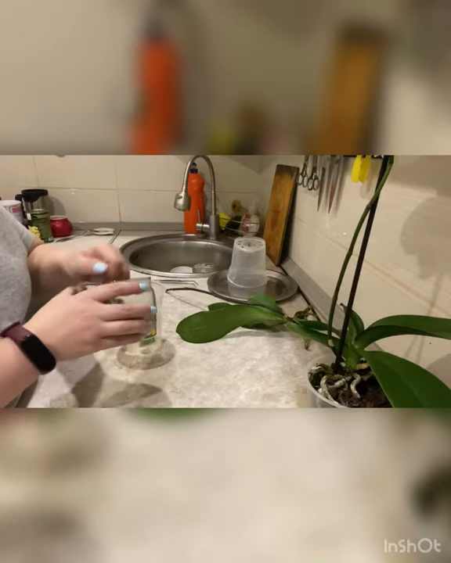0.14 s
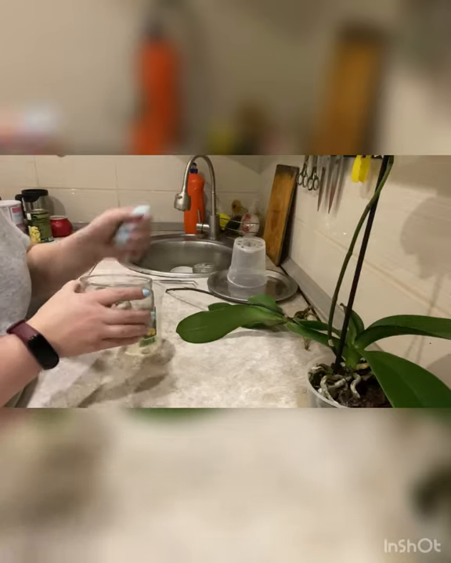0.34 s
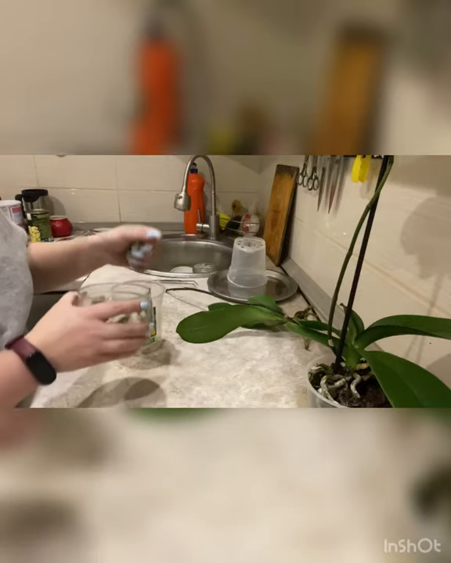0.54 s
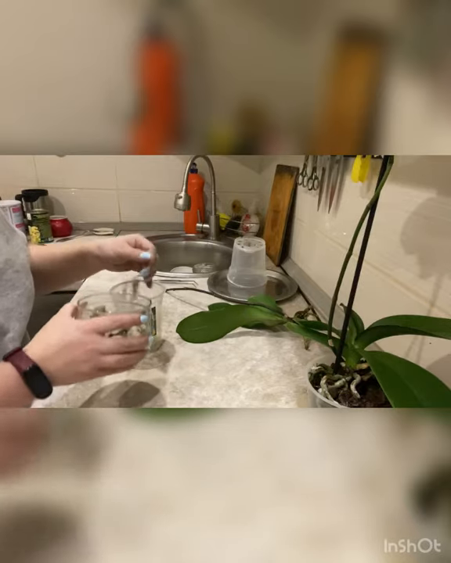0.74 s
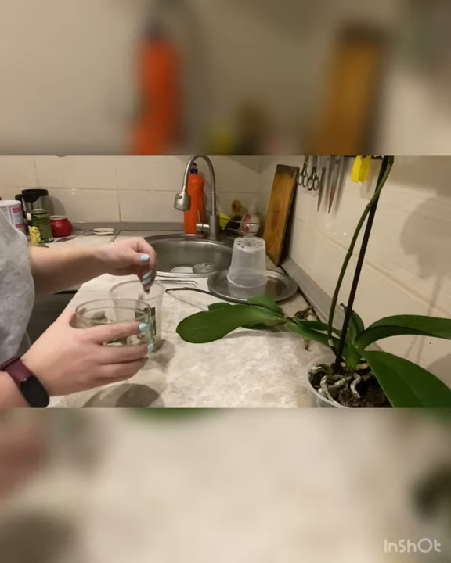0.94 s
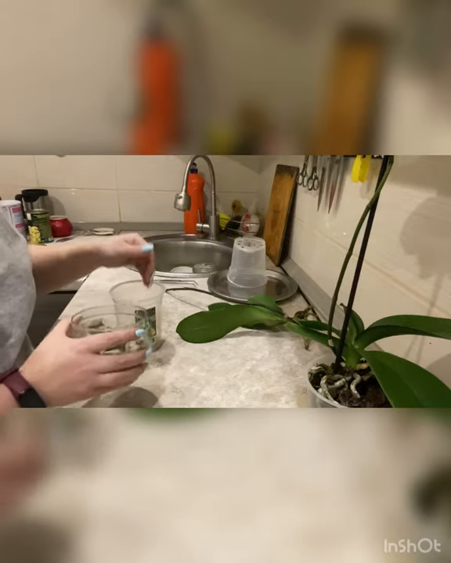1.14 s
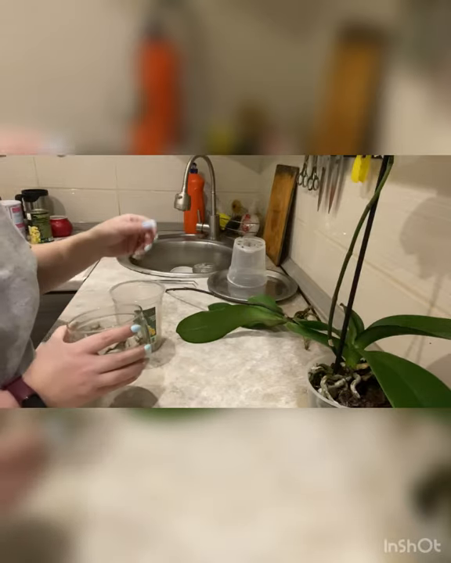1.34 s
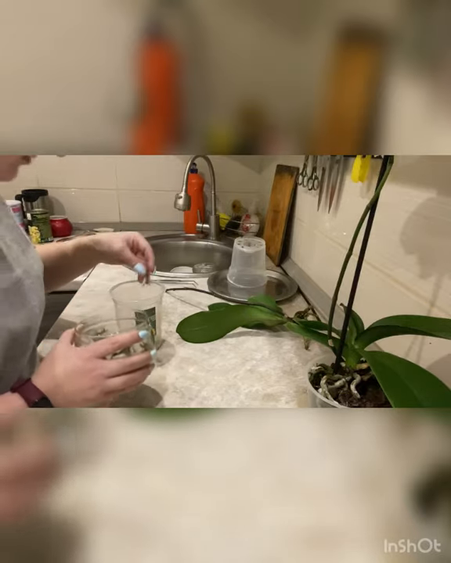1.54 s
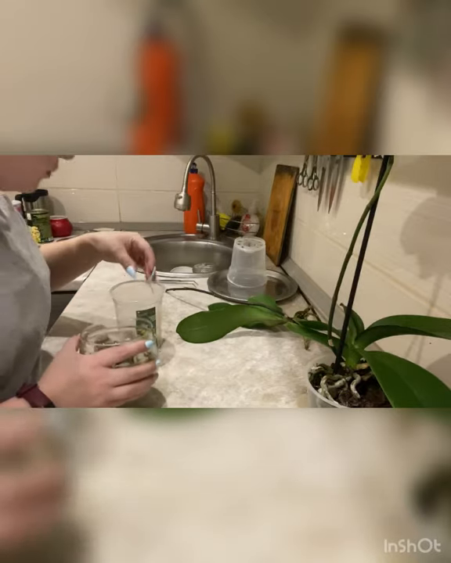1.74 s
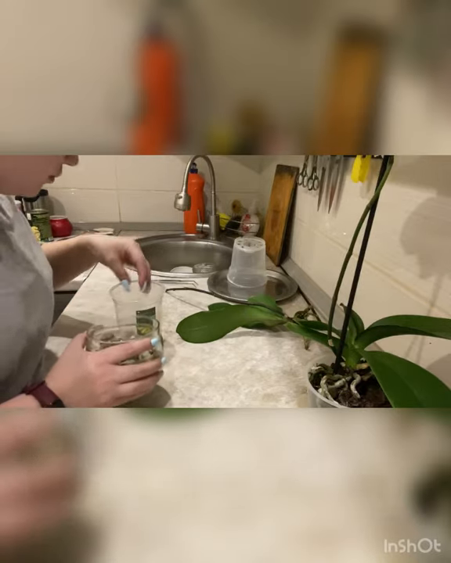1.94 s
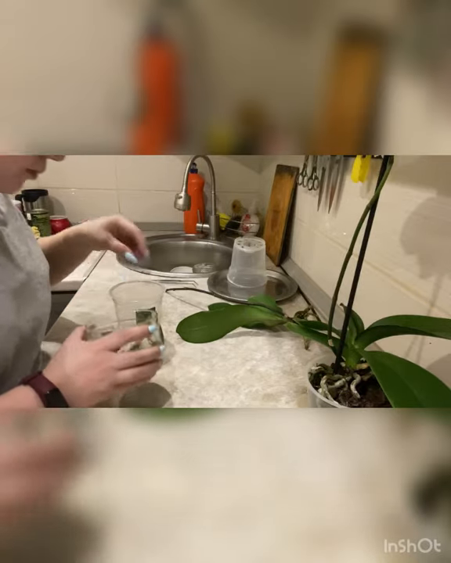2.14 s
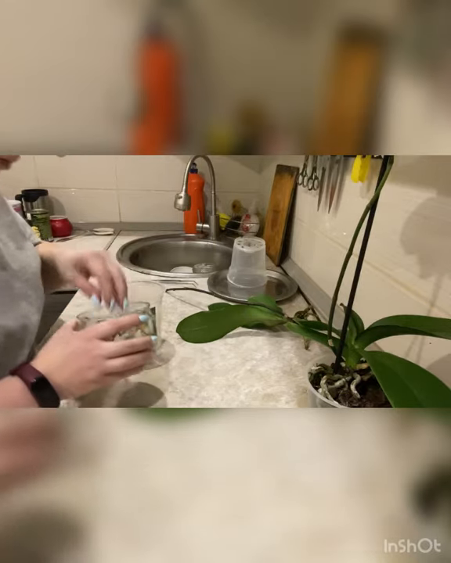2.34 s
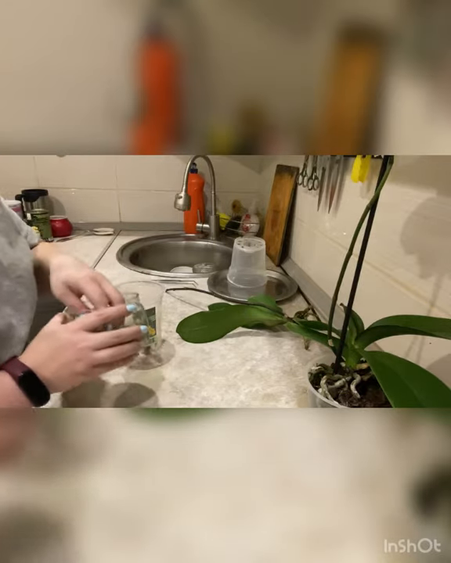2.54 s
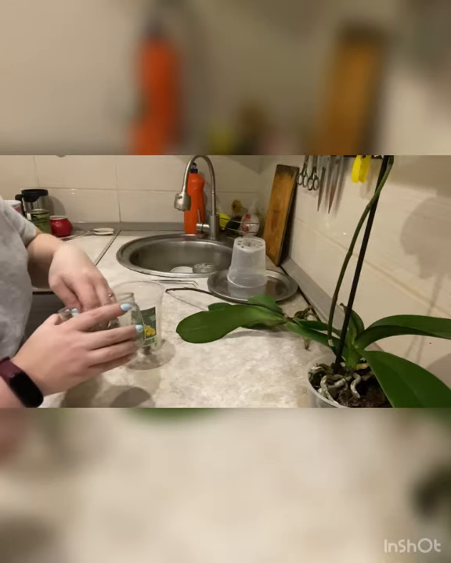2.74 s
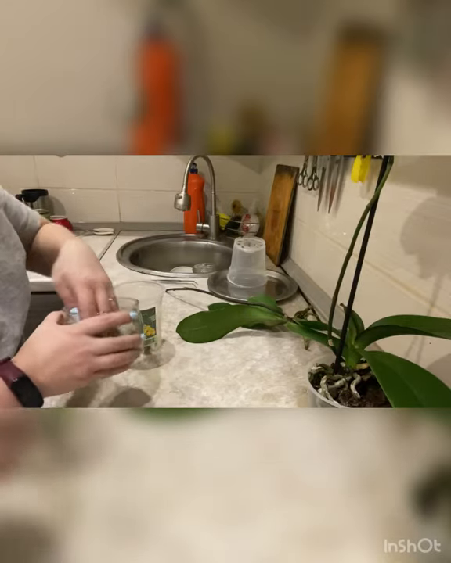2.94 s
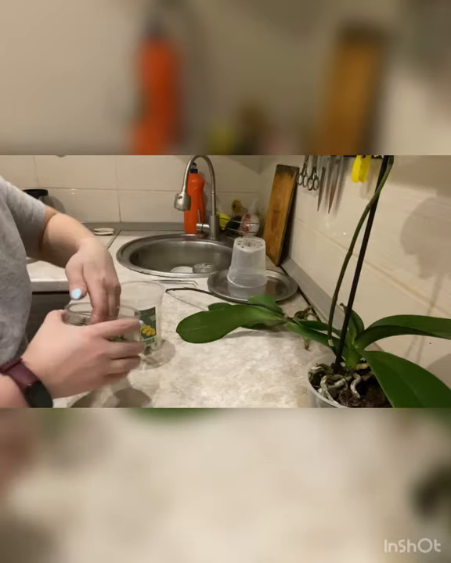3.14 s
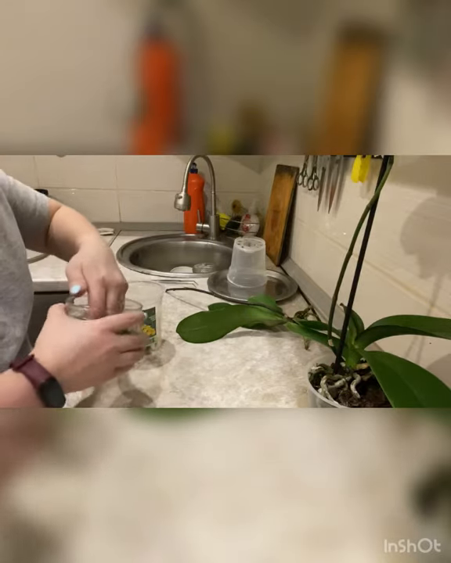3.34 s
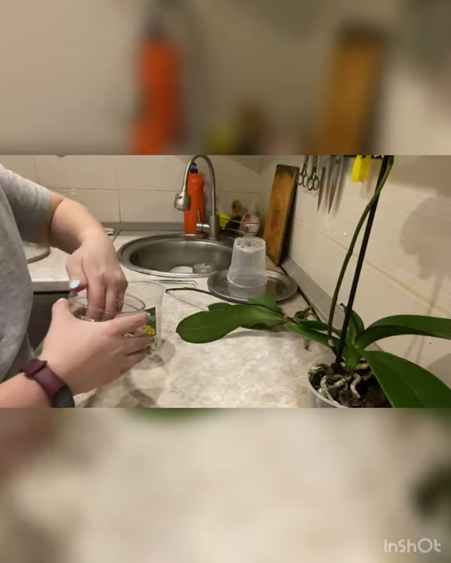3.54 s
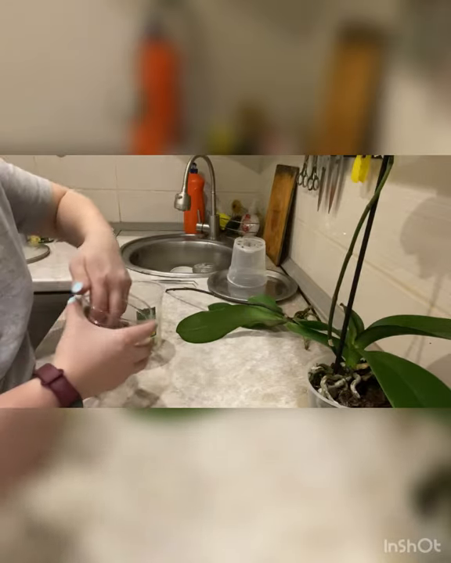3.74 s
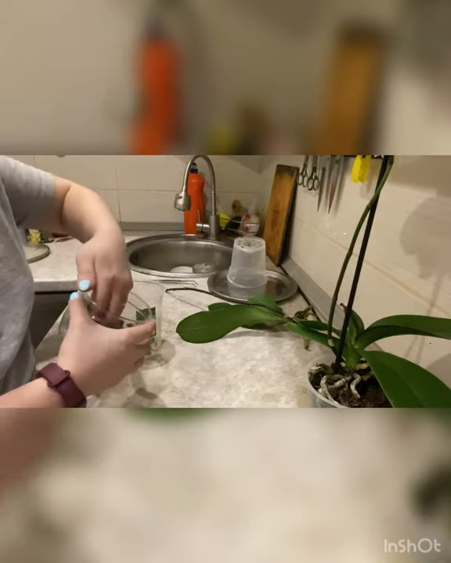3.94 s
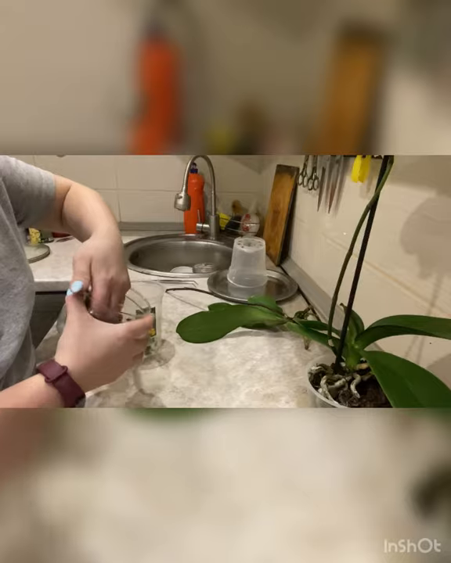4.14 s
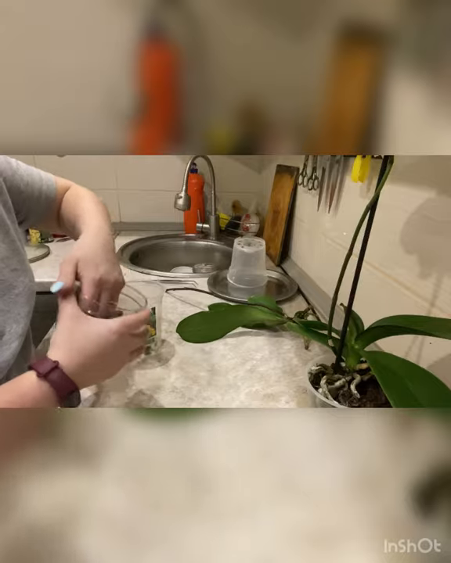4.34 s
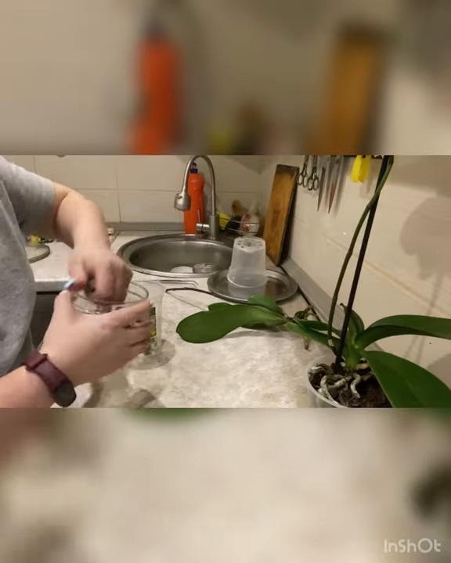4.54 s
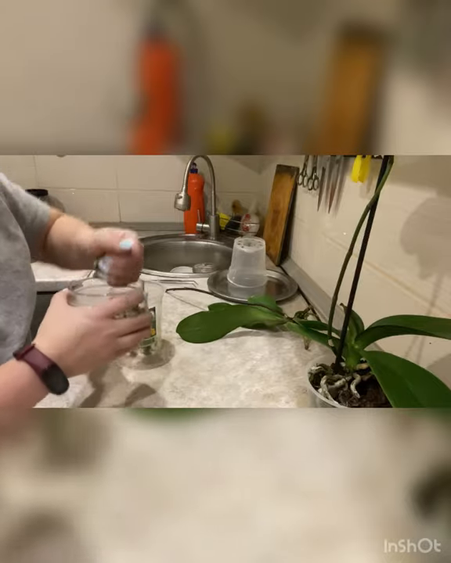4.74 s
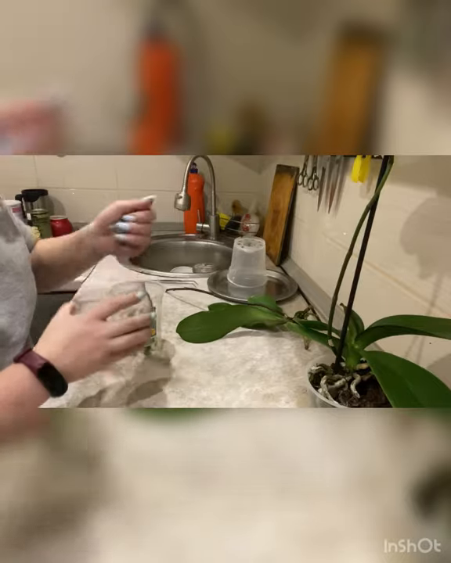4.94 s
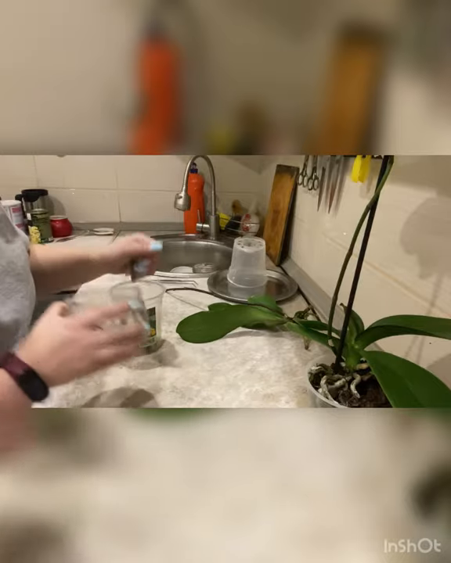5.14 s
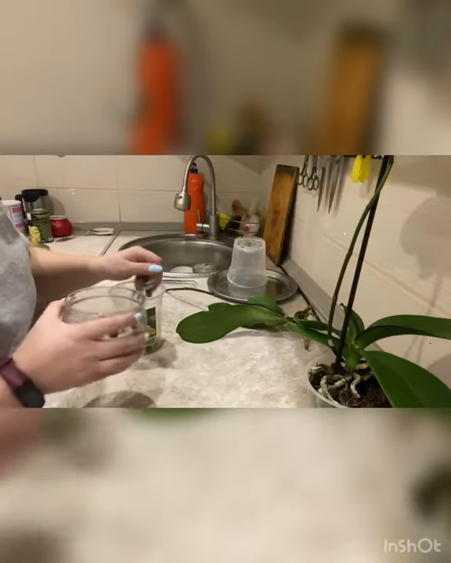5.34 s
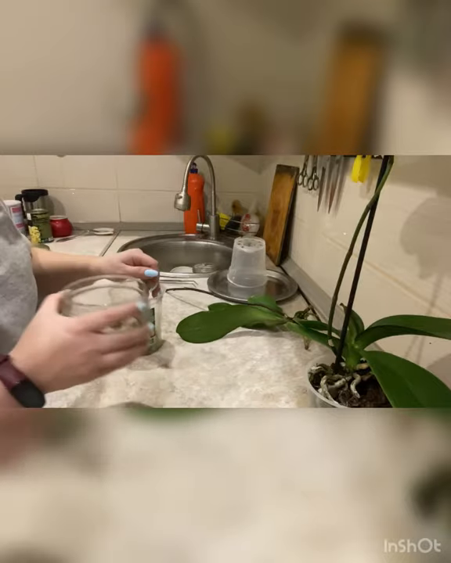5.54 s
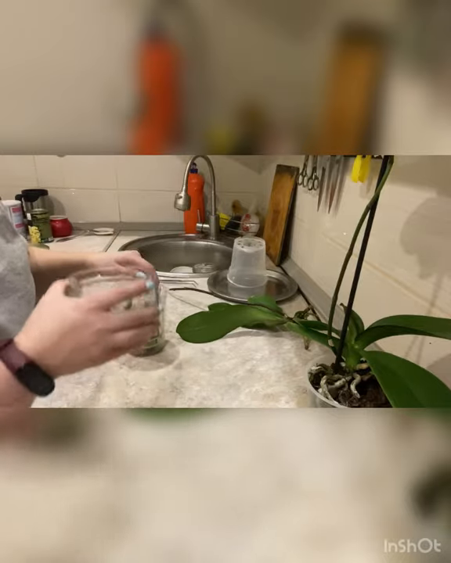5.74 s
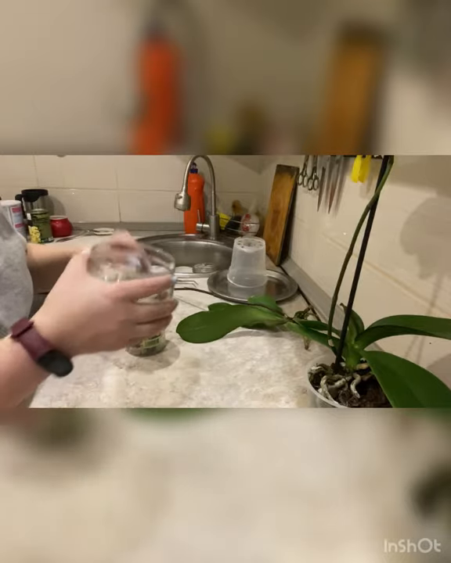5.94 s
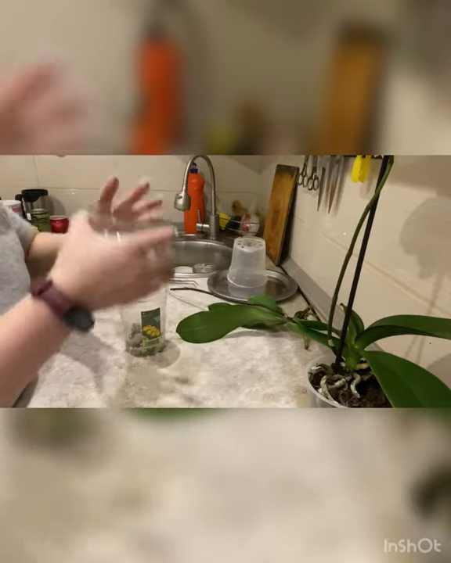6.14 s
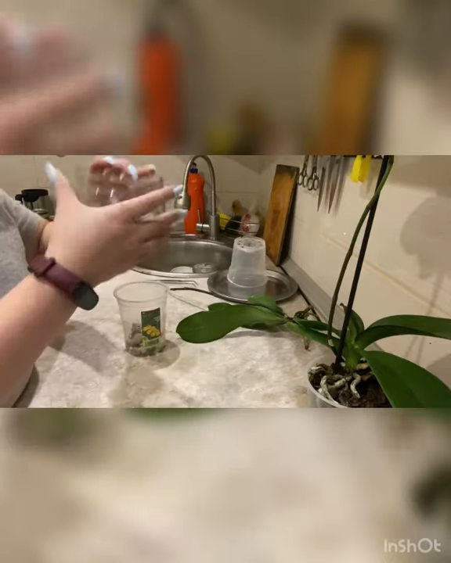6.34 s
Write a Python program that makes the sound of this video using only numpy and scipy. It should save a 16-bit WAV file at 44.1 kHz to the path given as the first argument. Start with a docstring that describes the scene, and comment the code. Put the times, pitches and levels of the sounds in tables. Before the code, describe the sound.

Dry pebbles click in a hand and spill into a plastic pot, with bright glassy scraping and crunching between the two pours, heard close.

```python
"""A tiled kitchen: light clay pebbles are handled near a phone with two microphone ports.
Fingers rummage in a hand-held glass bowl, carry a clicking handful across and let it fall into a thin plastic
pot on the counter, twice: each contact is a dry crack exciting damped modes, in dense beds and single knocks.
Filtered noise makes soft narrow hisses, a thud, a low rumble, the counter's boom and a quiet hum;
convolution with decaying noise adds the short ring of the room."""
import sys
import numpy as np
from scipy import signal
from scipy.fft import rfft, irfft, next_fast_len
from scipy.io import wavfile
from scipy.ndimage import uniform_filter1d

SR = 44100
rng = np.random.default_rng(int(sys.argv[2]) if len(sys.argv) > 2 else 0)


def to_wav(sig):
    """Store sig (one row per channel, or 1-D mono) as 16-bit WAV at the path in sys.argv[1].

    Samples outside -1..1 are clipped; the rate is SR.
    """
    pcm = np.clip(np.atleast_2d(sig), -1, 1) * 32767
    pcm = np.round(pcm).astype(np.int16)
    wavfile.write(sys.argv[1], SR, pcm.T)  # frames by channels


N = 286209
T = np.arange(N) / SR


def undb(db):
    """Decibel law: amplitude ratio of a level in dB."""
    return 10 ** (np.asarray(db) / 20)


def unit(x):
    """Normalisation to an rms amplitude of one."""
    return x / np.sqrt(np.mean(x ** 2, axis=-1, keepdims=True))


def gain_at(points, hz):
    """Frequency response: gain interpolated in dB between (f/Hz, level/dB) points on a log-frequency axis."""
    f, db = np.transpose(points)
    return undb(np.interp(np.log(hz + 1), np.log(f), db))


def colour(x, points):
    """Linear filtering: the spectrum is multiplied by a frequency response."""
    n = x.shape[-1]
    return irfft(rfft(x) * gain_at(points, np.fft.rfftfreq(n, 1 / SR)), n)


def ranges(x, edges_hz=(1400, 4100, 5700), steep=3.28):
    """Band division: low, middle, upper and treble parts that superpose to x."""
    n = x.shape[-1]
    hz = np.fft.rfftfreq(n, 1 / SR)
    below = [0] + [1 / (1 + (hz / edge) ** steep) for edge in edges_hz] + [1]
    return [irfft(rfft(x) * (b - a), n) for a, b in zip(below, below[1:])]


def low_noise(points, apart):
    """Partial coherence: shaped noise with a common part and an opposed part left and right."""
    mid, side = colour(rng.standard_normal((2, N)), points)
    return unit(mid + apart * side * np.array([[1], [-1]]))


def swell(peak_s, db, rise, fall):
    """Exponential growth and decay: a gain that climbs to a peak and falls at steady rates in dB/s."""
    return undb(db - np.where(T < peak_s, rise * (peak_s - T), fall * (T - peak_s)))


def heavy_noise(gain, tone):
    """Inertia: heavy bodies swell and fade without an edge, so the gain of the noise is smoothed."""
    noise = uniform_filter1d(gain, size=500) * low_noise(tone, .22)
    return noise * undb([[-.9], [.9]])


def follow(tables, column):
    """Envelope: one column of several stretches as a curve, with silence between them."""
    level_column = 1
    out = np.full(N, -140. if column == level_column else 0.)
    for rows in tables:
        rows = np.array(rows)
        inside = (T >= rows[0, 0]) & (T <= rows[-1, 0])
        out[inside] = np.interp(T[inside], rows[:, 0], rows[:, column])
    return uniform_filter1d(out, size=110, origin=54)  # smoothed over past samples only


def contacts(count, modes, crack, crack_s, ring_db, spot_db, spread, lowest_hz):
    """Modal superposition: a dry crack plus damped modes that each struck spot excites in its own mix."""
    t = np.arange(2048) / SR
    burst = rng.standard_normal((count, len(t))) * np.exp(-t / crack_s)
    # the causal filter with the crack's spectrum, from the folded cepstrum
    cepstrum = irfft(np.log(gain_at(crack, np.fft.rfftfreq(len(t), 1 / SR))))
    cepstrum[1:len(t) // 2] *= 2
    cepstrum[len(t) // 2 + 1:] = 0
    dry_crack = irfft(rfft(burst) * np.exp(rfft(cepstrum)))
    ring = 0
    for hz, width, db in modes:
        strength, sign, detune = rng.standard_normal((count, 3)).T[:, :, None]
        # equal height of the spectral peak needs more swing from a wider mode
        swing = undb(db + spot_db * strength) * width * np.sign(sign)
        # grip and load shift the pitch a little
        pitch_hz = hz * (1 + spread * detune)
        ring = ring + swing * np.exp(-np.pi * width * t) * np.sin(2 * np.pi * pitch_hz * t)
    both = unit(dry_crack) + undb(ring_db) * ring / np.sqrt(np.mean(ring ** 2))
    # a small body radiates nothing far below its lowest mode
    return signal.sosfilt(signal.butter(3, lowest_hz, "high", fs=SR, output="sos"), both)


def stir(tables, sounds, per_s, scatter_db, lift, dwell_s=.07):
    """Random impulse train: many small contacts, whose busy spot wanders so that the colour changes."""
    neighbour, moment, chance = rng.random((int(per_s * N / SR), 3)).T
    at = (moment * N).astype(int)
    busy = rng.integers(len(sounds), size=N)[(at / (dwell_s * SR)).astype(int)]
    spot = (busy + (3 * neighbour).astype(int)) % len(sounds)
    size_db = np.minimum(-scatter_db * np.log(chance), 12.0)
    hits = np.zeros((len(sounds), N))
    np.add.at(hits, (spot, at), undb(size_db))
    energy = np.mean(hits ** 2) * len(sounds)
    level, low, upper, treble = (follow(tables, column) for column in range(1, 5))
    shifts = (low - (1 - CRUNCH_LOW_SHARE) * lift[0], 0, upper, treble + lift[1])
    size, out = next_fast_len(N + sounds.shape[1]), 0
    for part, shift in zip(ranges(sounds), shifts):
        # the level scales each contact, so its ring dies on its own
        played = rfft(hits * undb(level + lift[0] + shift), size) * rfft(part, size)
        part_energy = np.mean(np.sum(part ** 2, axis=1))
        out = out + irfft(played.sum(0), size)[:N] / np.sqrt(energy * part_energy)
    return out


def knocks(rows, sounds, upper_db, ping_db, rattle_s, ping_s=0.0011):
    """Repeated impact: a first contact and a fading rattle; the pebble pings at its own pitch."""
    t = np.arange(1024) / SR
    out = np.zeros((2, N + 2 * sounds.shape[1]))
    draw = rng.random((len(rows), 2, len(t)))
    rattle = 0.65 * (2 * draw[:, 0] - 1) * (draw[:, 1] < .04)  # sparse, weaker contacts
    rattle[:, 0] = 1
    pans_db = 6.0 * (2 * draw[:, 0, 0] - 1)  # left minus right, scattered from knock to knock
    for (s, db, low_db, treble_db, hz), sound, more, pan_db in zip(rows, sounds, rattle, pans_db):
        push = more * np.exp(-t / rattle_s)
        parts = ranges(np.convolve(sound, push)[:-1])
        parts_db = (low_db, 0, upper_db, treble_db)
        hit = sum(undb(db + d) * part / np.abs(part).max() for part, d in zip(parts, parts_db))
        ping = np.convolve(t * np.exp(-t / ping_s) * np.sin(2 * np.pi * hz * t), push)
        hit[:len(ping)] += undb(db + ping_db) * ping / np.abs(ping).max()
        i = int(s * SR)
        out[:, i:i + len(hit)] += undb(np.array([[pan_db], [-pan_db]]) / 2) * hit
    return out[:, :N]


# pushes of the fingers: (t/s, length/s, rise of the bed level/dB, further rise of its treble level/dB)
CRUNCHES = [(2.61, 0.038, 6.5, 7.5), (2.77, 0.063, 3, -2), (2.858, 0.042, 4.5, 0.5), (2.97, 0.038, 5, -0.5),
            (3.095, 0.03, 3.5, 6), (3.155, 0.053, 7, -1), (3.265, 0.049, 6, 2), (3.325, 0.036, 8.5, 2.5),
            (3.43, 0.013, -1, 1.5), (3.48, 0.011, -3.5, 2.5), (3.6, .04, 2, 1), (3.758, 0.02, 9, 3.5),
            (3.85, .02, 3.5, -2), (3.897, 0.011, 2.5, 4), (3.98, 0.087, 6, -2.5), (4.06, 0.027, 5, 3),
            (4.16, 0.033, 9.5, -0.5), (4.25, 0.042, 0.5, 3), (4.295, 0.061, 4, 5), (4.475, 0.037, 12, -1)]
CRUNCH_ATTACK_S, CRUNCH_RELEASE_S = 0.0056, 0.017
CRUNCH_LOW_SHARE = 0.51  # the low ring follows a push by this share of its dB


def crunch(rows):
    """Amplitude envelope: each push shifts level and treble in dB by an attack, a hold and a release."""
    lift = np.zeros((2, N))
    for s, length, db, treble_db in rows:
        attack = (T - s) / CRUNCH_ATTACK_S
        release = 1 + (s + length - T) / CRUNCH_RELEASE_S
        shape = np.clip(np.minimum(attack, release), 0, 1)
        lift = lift + shape * np.array([[db], [treble_db]])
    return lift


def pebbles(tables, rows, per_s, scatter_db, stir_db, knock_db, upper_db, ping_db, rattle_s, pushes=(), **body):
    """Superposition: a bed of small contacts under the single knocks, all on one body."""
    bed = stir(tables, contacts(count=24, **body), per_s, scatter_db, crunch(pushes))
    single = knocks(rows, contacts(count=len(rows), **body), upper_db, ping_db, rattle_s)
    return undb(stir_db) * bed + undb(knock_db) * single


# spectrum of the hum: (f/Hz, relative level per Hz/dB)
HUM = [(15, -44), (25, -18), (91, -7.5), (118, -13.5), (149, -5), (231, -15), (463, -16), (600, -18),
       (648, -37), (776, -23), (1340, -28.5), (3750, -24), (6980, -34), (11100, -33.5), (12000, -38),
       (15600, -66.5), (22000, -120)]


def hum():
    """Stationary noise: a quiet steady hum of fixed spectrum, unrelated left and right."""
    return undb(-74) * low_noise(HUM, 1.0)


# dense contacts, a list a stretch: (t/s, relative level/dB, low ring level/dB, upper ring level/dB, treble level/dB)
BOWL_STIR = [
    [(0.0, -46.5, -16, 6, 5), (0.062, -61.5, -24, 2, 8), (0.088, -54.5, -11, -1, 13.5),
     (0.3, -76, -3, -10, 6)],
    [(2.486, -50, -1, 0.5, -2.5), (2.6, -52.5, 6, -1, -1.5), (2.8, -49.5, -7.5, 3, -0.5),
     (3.08, -51, -3.5, -8, 0.5), (3.34, -46, -3, -6.5, 4.5), (3.57, -49, -9.5, -3, -1.5),
     (3.9, -45, -11, -4, 2), (4.24, -50, -6, -6, -1), (4.4, -48.5, -8, 5, 1.5), (4.46, -55.5, -23, 9.5, 1),
     (4.6, -74, -22.5, 7, 12.5)],
    [(5.98, -68, -20, 4, -10), (6.03, -68, -22, 4, -23), (6.4, -75.5, -4, 12.5, -25),
     (6.436, -50, 1.5, 7, -9), (6.465, -49, -8, 8.5, -3), (6.49, -54, -4, 0, -7)],
]
# single knocks: (t/s, relative peak level/dB, low ring level/dB, treble level/dB, ping f/Hz)
BOWL_KNOCKS = [(0.0766, -42, -36, -5, 4730), (0.0895, -35, -35, 4, 4630), (0.112, -41.5, -34, 14.5, 4770),
               (0.1346, -43, -19, -7, 4470), (2.4867, -43, -12, -12, 3490), (2.5162, -35.5, -9, 1, 5100),
               (2.6768, -43, -4, 20.5, 3400), (2.7002, -35, -18, -1, 3200), (2.7238, -36.5, -2, 3, 4350),
               (2.7714, -32.5, -2.5, 9, 2600), (2.8627, -33.5, -8, 8, 4500), (2.9004, -33.5, -4, -11, 4340),
               (2.9828, -38, -7, -14, 2550), (3.0417, -55, -2, 4, 2480), (3.0615, -44.5, 2, 13, 2090),
               (3.0952, -43, -12, 17, 2480), (3.1038, -32.5, 0, 13.5, 5070), (3.1234, -40, -10, 17, 2110),
               (3.1575, -28.5, -11, 0, 5080), (3.1653, -24.5, -15, 5.5, 4960), (3.1857, -28, -26, -9, 2500),
               (3.2804, -31, -25, -7, 2100), (3.3012, -28.5, -4.5, -9, 2520), (3.3374, -30, -11, -14, 2110),
               (3.3549, -25, -34, -6, 4600), (3.4338, -31, -23, -6, 4520), (3.481, -33.5, -13, 11.5, 3300),
               (3.5232, -39, -19, 10, 5240), (3.622, -33, -12, -6, 5140), (3.7744, -28.5, -19, -8, 2060),
               (3.826, -46, -22, -8, 4770), (3.857, -29.5, -8, 9, 4750), (3.897, -26.5, -13.5, 7, 4460),
               (4.0078, -28, -43, -22, 4630), (4.028, -23, -24, -6, 4710), (4.0729, -26.5, -19, 13, 4700),
               (4.1626, -30, -18, -14, 2680), (4.1736, -26, -27, -9, 4700), (4.1984, -32, -28, -20, 2660),
               (4.2622, -34.5, -16, -9, 1780), (4.2942, -17, -22, -2.5, 4550),
               (4.3295, -23.5, -26, -8, 4900), (4.3504, -42, -27, -15, 4900),
               (4.3736, -27.5, -15, -12, 2630), (4.4766, -33.5, -48, 7, 4440), (4.4942, -29, -47, 4, 4800),
               (4.504, -43, -42, -18, 4740), (6.4383, -43, 2, -19, 5100), (6.451, -30, -27, -24, 5160),
               (6.4652, -29.5, -2.5, 4, 4700)]
# modes of the glass: (f/Hz, width/Hz, relative level/dB)
BOWL_MODES = [(862, 30, 5), (1040, 110, -8), (1930, 90, -4), (2095, 70, -6), (2480, 90, -5), (2630, 90, -7),
              (3430, 220, -10), (4520, 90, -3), (4680, 80, 0), (4820, 90, -3), (5030, 80, -7),
              (7150, 90, -9), (8700, 200, -11), (10100, 130, -11)]
# dry crack of pebbles and glass: (f/Hz, relative level per Hz/dB)
BOWL_CRACK = [(200, -68), (500, -45), (900, -8.5), (1500, -17), (3000, -15), (6000, -12), (11000, -18.5),
              (16000, -34)]


def glass_bowl():
    """Modal vibration of a shell: fingers push pebbles about in glass with narrow, steady modes."""
    return pebbles(BOWL_STIR, BOWL_KNOCKS, per_s=1500, scatter_db=3.5, stir_db=-5.0, knock_db=-4.0, upper_db=1.5,
                   ping_db=1.3, rattle_s=0.0034, pushes=CRUNCHES, modes=BOWL_MODES, crack=BOWL_CRACK,
                   crack_s=0.0014, ring_db=2.5, spot_db=4.5, spread=.006, lowest_hz=587)


# dense contacts, a list a stretch: (t/s, relative level/dB, low ring level/dB, upper ring level/dB, treble level/dB)
FIST_STIR = [
    [(0.26, -77, -30, -4, 4), (0.49, -63.5, -36, -1, 4), (0.66, -66, -32, 3, 6.5)],
    [(1.3, -77.5, -2.5, 2, 2), (1.5, -79.5, -1.5, -5.5, -9), (1.6, -102, 0, 1, -10)],
    [(4.55, -68.5, -24, 3, -1.5), (4.68, -70.5, -4.5, 1.9, -1.8), (4.926, -70.5, -0.5, 2.1, -1.8),
     (5.096, -70, -11, 2.6, -1.9), (5.2, -66.5, -16, 3, -1.5)],
]
# single knocks: (t/s, relative peak level/dB, low ring level/dB, treble level/dB, ping f/Hz)
FIST_KNOCKS = [(0.185, -47, -21, 9, 4600), (0.206, -59, -18, -3, 4520), (0.2325, -45.5, -13, 9, 4570),
               (0.2533, -48.5, -20, -8, 4430), (0.29, -44, -21, 5, 2450), (0.3128, -42, -5, 7.5, 4580),
               (0.3671, -35.5, -33, 2.5, 2640), (0.374, -43, -30, -6, 2500), (0.3802, -40.5, -39, 2, 2760),
               (0.4197, -56, -38, 17, 2586), (0.452, -41, -38, 6, 2845), (0.473, -36.5, -39, 2, 2830),
               (0.508, -43.5, -28, 18, 2900), (0.5495, -46.5, -35, 13.5, 4070),
               (0.639, -39, -24, 6.5, 4200), (1.9998, -51.5, -36, -19.5, 2010),
               (2.0122, -36.5, -29, -19, 2234), (4.6003, -43, -42, -15, 2910),
               (4.646, -29, -43.5, -8.5, 3930), (4.656, -39, -41, -3, 4100),
               (4.7046, -40.5, -31, 1.5, 3790), (4.8551, -50, -6, -20.5, 4500),
               (4.8856, -42.5, -11.5, -9.5, 4580), (5.019, -43, -31, -12, 2820),
               (5.0618, -43.5, -41, -20, 3810), (5.0835, -40, -35, -19, 2790),
               (5.1144, -34.5, -28, -11, 3900), (5.1338, -38.5, -28, -14.5, 4140),
               (5.1622, -37.5, -25, 2, 4070)]
# modes of the carried handful: (f/Hz, width/Hz, relative level/dB)
FIST_MODES = [(2690, 87, -0.5), (4140, 300, -3.5), (4464, 380, -6.5), (9150, 180, -0.5), (9200, 250, -5),
              (11000, 110, -10)]
# dry crack of pebble on pebble: (f/Hz, relative level per Hz/dB)
FIST_CRACK = [(290, -69.5), (500, -33), (750, -45), (906, -30), (1720, -24), (2610, -12.5), (7100, -6.5),
              (10200, -5.5), (12900, -15), (16000, -23)]


def carried_handful():
    """Damped impact: pebbles click in the hand, more crack than ring."""
    return pebbles(FIST_STIR, FIST_KNOCKS, per_s=1700, scatter_db=2.4, stir_db=-3.0, knock_db=-3.0, upper_db=-8,
                   ping_db=-5.5, rattle_s=0.0014, modes=FIST_MODES, crack=FIST_CRACK, crack_s=0.0026,
                   ring_db=-8.0, spot_db=8.5, spread=0.024, lowest_hz=400)


# dense contacts, a list a stretch: (t/s, relative level/dB, low ring level/dB, upper ring level/dB, treble level/dB)
POT_STIR = [
    [(0.655, -59, -8, -5, 4), (0.661, -47.5, 9.5, -3, 3), (0.691, -39.5, 0.5, -11, -6),
     (0.725, -49, 10.5, 1, -8), (0.733, -35.5, 10, -2, -3), (0.825, -30.5, -4.5, -10, -4),
     (0.881, -40.5, -3, -7, -7.5), (1.027, -40, -0.5, -19, -13), (1.095, -54, 0, -8, 0),
     (1.133, -49.5, -14.5, -9, -15), (1.319, -76, 7, 3, 0), (1.535, -79.5, 3.5, -9, -10.5),
     (1.6, -91.5, 1.5, -9, -12)],
    [(5.18, -59, -12, -3, -1), (5.214, -41.5, -1.5, 2.5, -3), (5.28, -51.5, -11, 10, 7),
     (5.294, -36, 1, -2, -10), (5.326, -38, 3, -6, -1), (5.342, -29.5, -7, -10, -21),
     (5.378, -38, -1, -1, -14), (5.472, -27.5, -3.5, -17, -11), (5.626, -51.5, -11, -17, -6),
     (5.726, -46, -5, -19, -19), (5.822, -59, -10, -6, -11), (5.828, -40, -11.5, -19, -10),
     (5.954, -61.5, -1, 0, -12.5), (6.35, -87, 16.5, 7.5, -10)],
]
# single knocks: (t/s, relative peak level/dB, low ring level/dB, treble level/dB, ping f/Hz)
POT_KNOCKS = [(0.6628, -23, -4.5, -16.5, 4140), (0.6828, -23.5, -7, -21, 2110),
              (0.7347, -15.5, -0.5, -5, 2870), (0.7599, -13.5, -13.5, -19.5, 2020),
              (0.7754, -23, -6, -14.5, 1950), (0.7946, -10.5, -17, -19.5, 3460),
              (0.8013, -20, -15.5, -17.5, 2480), (0.8158, -14.5, -18.5, -19.5, 4420),
              (0.8229, -21, -14, -21, 2640), (0.8303, -15, -14.5, -18, 2570),
              (0.8936, -22.5, -10.5, -11, 2780), (0.9397, -21, -15, -15, 3680),
              (0.9573, -17, -14.5, -13.5, 2990), (1.005, -26, -7.5, -18.5, 2640),
              (1.0278, -20.5, -12, -23, 2520), (1.0571, -25, -9.5, -18, 2520),
              (1.1116, -32, -12.5, -21, 1970), (1.136, -31, -7, -29, 2800), (1.1877, -35, -12.5, 1, 3440),
              (1.2226, -41.5, -15, -14, 2030), (5.183, -46, -5, 1, 4080), (5.2106, -33.5, -4, 0, 3540),
              (5.222, -24, -11, -4, 2030), (5.2689, -21, 3, 11, 3780), (5.294, -15, -4.5, -16, 1950),
              (5.3407, -15, -27, -16, 2490), (5.3504, -20, -14.5, -28, 2580), (5.3928, -19, -13, -23, 2510),
              (5.4115, -17, -20.5, -27, 2730), (5.4373, -12, -20, -29, 3780), (5.4464, -15, -21, -21, 2630),
              (5.4656, -11.5, -21.5, -19.5, 2610), (5.501, -20, -12, -22, 2610),
              (5.5155, -16, -20, -40, 2700), (5.5799, -24, -26, -14, 3280),
              (5.6434, -38.5, -15, -24.5, 2030), (5.6692, -30.5, -10.5, -24, 1970),
              (5.6975, -32, -10, -26, 2030), (5.7292, -36.5, -19, -29, 2020), (5.77, -38.5, -20, -14, 2080),
              (5.8292, -18.5, -6.5, -17, 2130)]
# modes of the thin plastic: (f/Hz, width/Hz, relative level/dB)
POT_MODES = [(640, 89, 2.5), (979, 180, 2.5), (1336, 120, -6.5), (1950, 180, -2.5), (2480, 47, -10),
             (2610, 110, -9.5), (2930, 120, -2), (3536, 510, -14.5), (4200, 130, -7.5), (5600, 230, -9.5)]
# dry crack of pebbles and plastic: (f/Hz, relative level per Hz/dB)
POT_CRACK = [(120, -35), (200, -20.5), (353, -21.5), (623, -6), (950, -4.5), (1650, -13), (1910, -20),
             (2650, -6), (7270, -11), (10100, -11.5), (12400, -18.5), (16000, -36.5)]


def plastic_pot():
    """Modal vibration of a thin wall: falling pebbles excite low, broad modes of the plastic."""
    return pebbles(POT_STIR, POT_KNOCKS, per_s=700, scatter_db=2.9, stir_db=-5.0, knock_db=-1.9, upper_db=-7.5,
                   ping_db=-6, rattle_s=0.0042, modes=POT_MODES, crack=POT_CRACK, crack_s=.0018,
                   ring_db=-1.5, spot_db=7.0, spread=0.023, lowest_hz=228)


# spectrum of the counter: (f/Hz, relative level/dB)
BOOM_TONE = [(15, -54), (25, -31.5), (92, 3.5), (129, 1), (216, -1), (248, -16), (292, 0.5), (352, -16),
             (394, -4), (500, -13.5), (650, -32.5), (1100, -120)]
# heavier pebbles bump the counter: (t/s of the peak, level/dB before smoothing)
BUMPS = [(1.02, -59), (1.17, -62.5), (5.462, -39), (5.725, -58), (5.95, -64)]
# rates of a bump: (rise/dB per s, fall/dB per s)
BUMP_DB_PER_S = (400, 167)
BOOM_DB, BOOM_T60_S = -11, 0.35  # level against the pot's low ring; decay time of the counter


def counter_boom(pot):
    """Energy storage: the counter takes up the power of the falling pebbles and lets it die slowly."""
    keep = np.exp(-2 * np.log(1000) / (BOOM_T60_S * SR))
    power = np.mean(ranges(pot)[0] ** 2, axis=0)
    stored = signal.lfilter([1 - keep], [1, -keep], power)
    bumps = sum(swell(*bump, *BUMP_DB_PER_S) for bump in BUMPS)
    return heavy_noise(undb(BOOM_DB) * np.sqrt(stored) + bumps, BOOM_TONE)


# soft narrow hisses: (t/s of the peak, relative level/dB, rise/dB per s, fall/dB per s, f/Hz, sag/Hz per s, width/Hz)
HISSES = [(1.49, -71.5, 149.5, 156.5, 1897, 299.5, 702), (4.86, -62, 26, 14.5, 4420, -250, 261),
          (6.051, -64.5, 500, 35, 1811, 600, 130)]


def hiss(peak_s, db, rise, fall, hz, sag, width):
    """Quadrature modulation: a narrow noise band that drifts in pitch."""
    band = signal.butter(2, width / 2, fs=SR, output="sos")
    a, b = unit(signal.sosfilt(band, rng.standard_normal((2, N))))
    phase = 2 * np.pi * np.cumsum(hz - sag * (T - peak_s)) / SR
    return swell(peak_s, db, rise, fall) * (a * np.cos(phase) + b * np.sin(phase))


# spectrum of the thud: (f/Hz, relative level/dB)
THUD_TONE = [(15, -50.5), (25, -27.5), (54, -3), (112, -10), (151, 3.5), (204, -21), (442, -30), (600, -42),
             (780, -74.5), (1320, -120)]
# swell of the thud: (level/dB before smoothing, rise/dB per s, fall/dB per s)
THUD = (-46.5, 520, 207)


def thud():
    """Transient low-frequency noise: a soft thud with a fast rise and a slower fall."""
    return heavy_noise(swell(2.105, *THUD), THUD_TONE)


# spectrum of the rumble: (f/Hz, relative level/dB)
RUMBLE_TONE = [(13, -47.5), (22, -30), (59, 3), (124, -21), (156, -11.5), (200, -42), (300, -22),
               (390, -25), (660, -120)]
# swell of the rumble: (level/dB before smoothing, rise/dB per s, fall/dB per s)
RUMBLE = (-57, 180, 25)


def rumble():
    """Transient low-frequency noise: a rumble that rises quickly and fades slowly."""
    return heavy_noise(swell(6.18, *RUMBLE), RUMBLE_TONE)


# reverberation: (f/Hz, decay time by 60 dB/s, relative level/dB)
KITCHEN = [(202, 0.18, 7.5), (802.5, .32, -1.5), (3020, 0.34, -1.5), (6050, 0.17, -9.5),
           (12200, 0.072, 2.5)]


def kitchen(x):
    """Reverberation: tiles and steel return a short tail, unrelated left and right, decaying band by band."""
    t = np.arange(SR // 2) / SR
    f, t60s, dbs = np.transpose(KITCHEN)
    tail = 0
    for hz in 125 * 2 ** np.arange(7.5):  # octave bands
        t60, db = (np.interp(np.log(hz), np.log(f), column) for column in (t60s, dbs))
        edges_hz = [hz / np.sqrt(2), min(hz * np.sqrt(2), .45 * SR)]
        band = signal.butter(2, edges_hz, "band", fs=SR, output="sos")
        noise = signal.sosfilt(band, rng.standard_normal((2, len(t))))
        decay = np.exp(-np.log(1000) * t / t60)
        tail = tail + undb(db) * noise * decay / np.sqrt(np.sum(decay ** 2))
    tail = tail * (1 - np.exp(-(t / 0.0005) ** 2))  # soft onset
    return signal.fftconvolve(x.mean(0)[None], tail, axes=1)[:, :N]


# phase between the ports: (f/Hz, lead of the left port/rad)
PORT_PHASE = [(0, 0), (690, -0.6), (1380, 0.9), (1640, -0.2), (1890, 0.6), (3700, 0.5), (4480, 1.6),
              (7410, 3.8), (9040, 6.1), (10300, 6.4), (12000, 9.3), (13700, 9.5), (14600, 12.4),
              (16200, 12.7)]


def ports(x):
    """Interchannel phase: the near sound is turned by opposite halves of the lead at the two ports."""
    f, lead = np.transpose(PORT_PHASE)
    turn = np.exp(.5j * np.interp(np.fft.rfftfreq(N, 1 / SR), f, lead))
    return irfft(rfft(x) * np.array([turn, turn.conj()]), N)


def scene():
    """Superposition: near sounds, their reverberation, low noises and the hum add up."""
    pot = plastic_pot()
    hisses = sum(hiss(*row) for row in HISSES)
    near = (glass_bowl() + carried_handful() + pot + hisses) * undb([[-.6], [.6]])
    low = counter_boom(pot) + thud() + rumble()
    return ports(near) + undb(3.0) * kitchen(near) + low + hum()


# treble levels of the whole sound: (f/Hz, level/dB)
TREBLE = [(11700, -1.49), (12200, -6.5), (13600, -5.5), (14300, 0.5), (16000, -6)]


def record(dry):
    """Band limitation: the deepest bass is cut, the treble drops away above 12 kHz and ends at 16 kHz."""
    bass_cut = signal.butter(2, 35, "high", fs=SR, output="sos")
    top_cut = signal.ellip(10, .2, 80, 16000, fs=SR, output="sos")
    return signal.sosfilt(top_cut, signal.sosfilt(bass_cut, colour(dry, TREBLE)))


dry = scene()
out = record(dry)
to_wav(out)
```